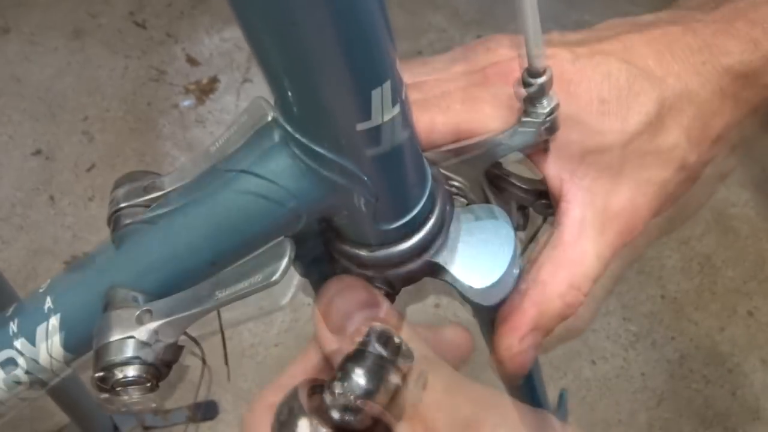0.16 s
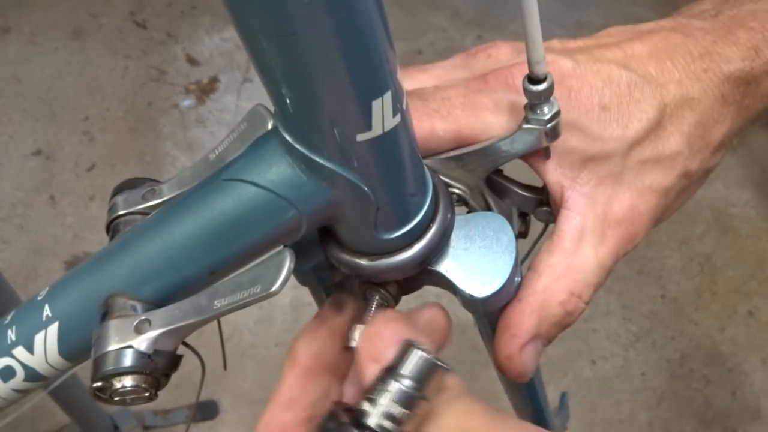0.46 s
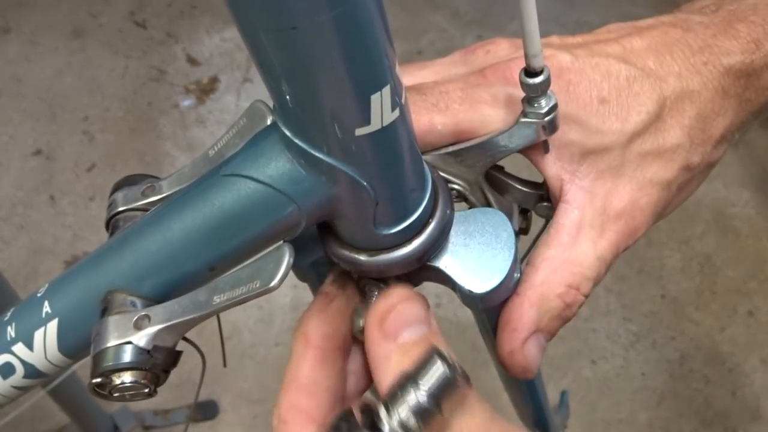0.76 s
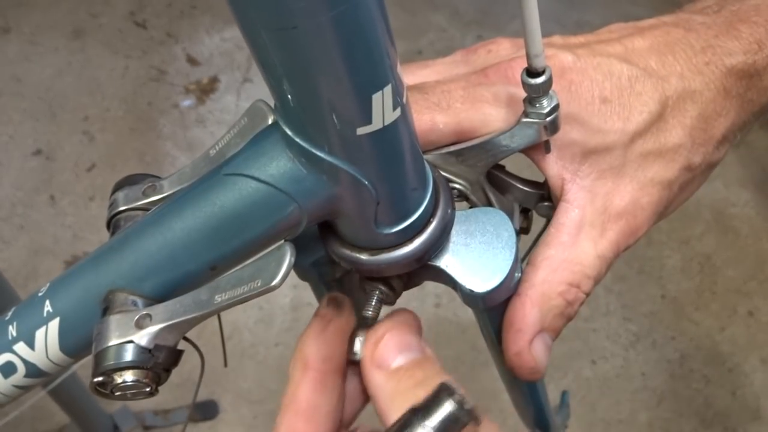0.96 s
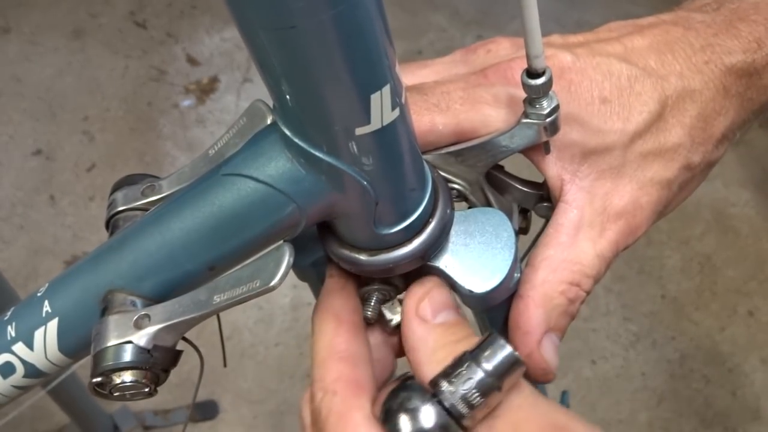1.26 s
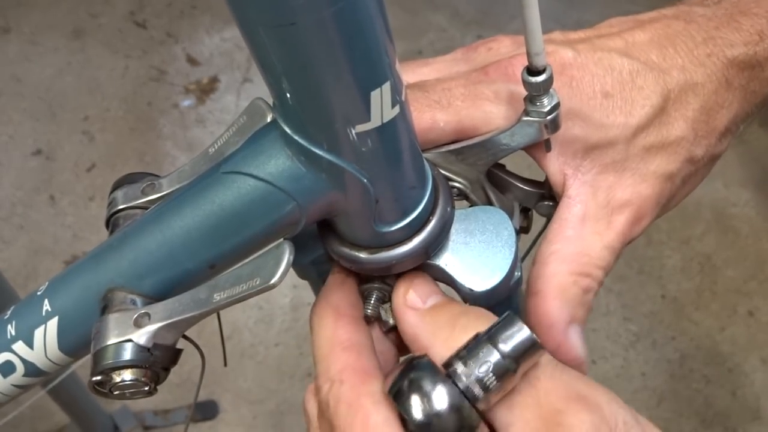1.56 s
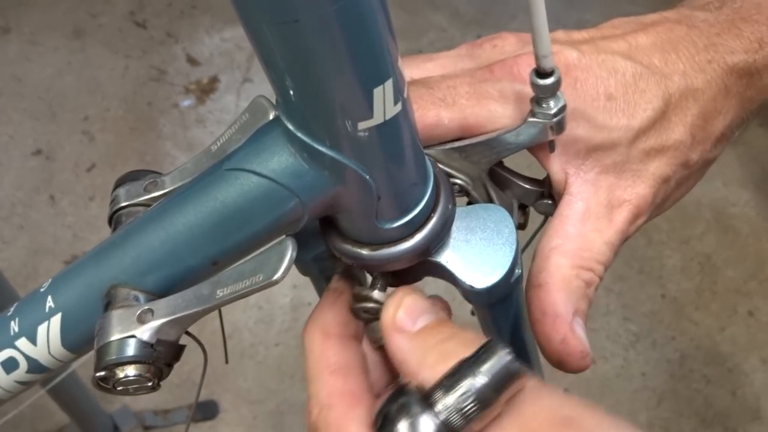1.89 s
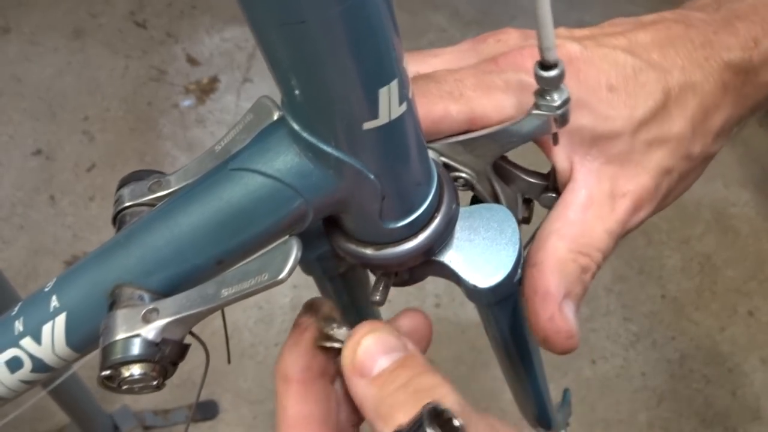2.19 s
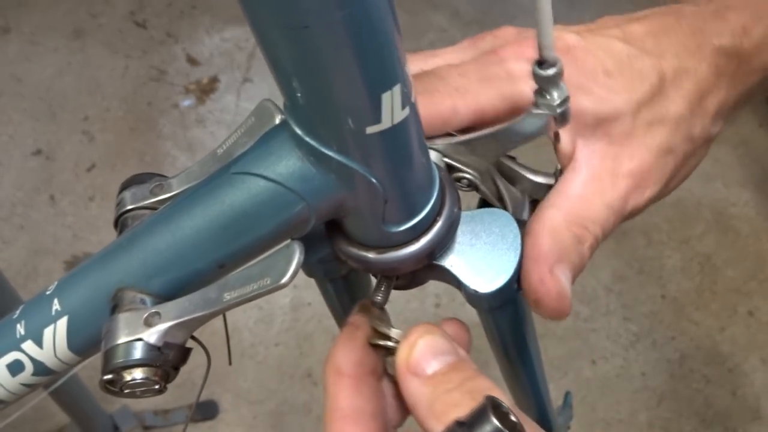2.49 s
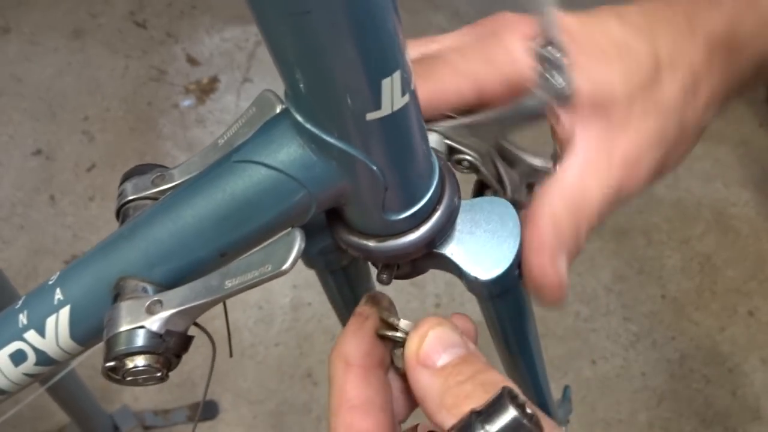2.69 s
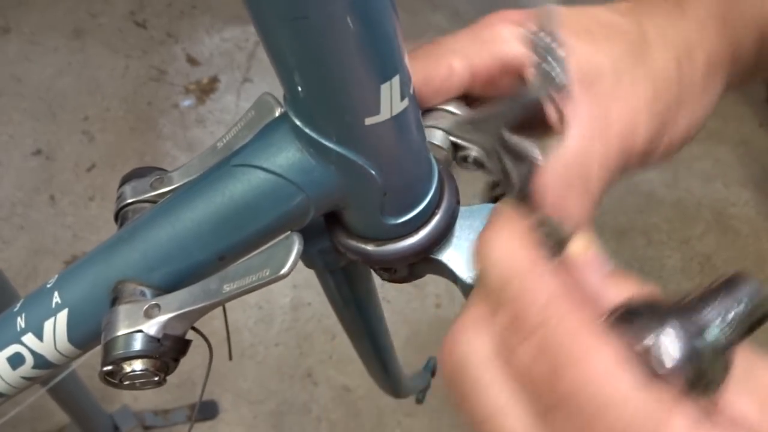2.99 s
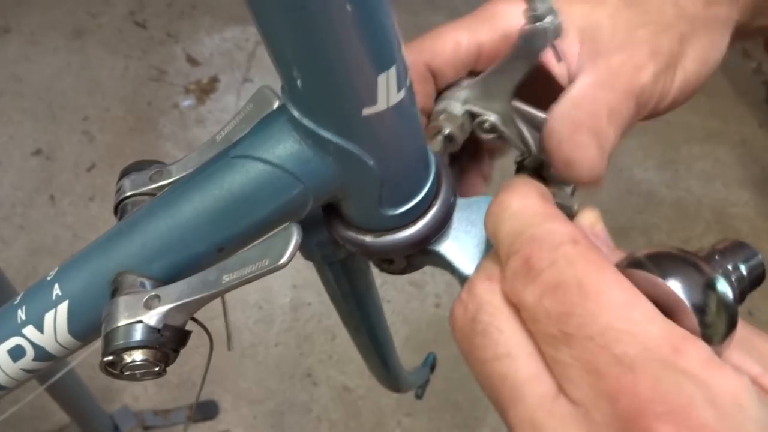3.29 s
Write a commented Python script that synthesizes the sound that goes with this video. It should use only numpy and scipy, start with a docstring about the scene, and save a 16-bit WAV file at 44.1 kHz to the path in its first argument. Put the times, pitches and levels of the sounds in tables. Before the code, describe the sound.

Ratchet wrench clicks in short bursts, then small loose steel parts clink and knock.

```python
"""In a workshop, a ratchet wrench clicks in short bursts at a bicycle brake nut; the nut and washer spin
off, then loose brake parts clink, rub and knock on the frame tubes. Clicks and clinks are noise snaps
plus decaying steel modes, rubs are dense random slips, knocks are short contacts ringing tube modes.
Thin pings, a patchy noise hum, a growing low rumble and a noise-tail room complete it, in stereo."""
import sys
import numpy as np
from scipy import signal
from scipy.fft import rfft, irfft
from scipy.io import wavfile
from scipy.ndimage import uniform_filter1d

SR = 44100
rng = np.random.default_rng(int(sys.argv[2]) if len(sys.argv) > 2 else 0)


def file_out(sig):
    """Save sig as 16-bit WAV at sys.argv[1]."""
    # one column per channel
    cols = np.atleast_2d(sig).T
    # limit, then scale
    lim = np.clip(cols, -1, 1)
    pcm = np.round(lim * 32767).astype(np.int16)
    wavfile.write(sys.argv[1], SR, pcm)


N = 152145


def amp(db):
    """dB to gain."""
    return 10 ** (np.asarray(db) / 20)


def evened(x):
    """Scales to rms 1."""
    return x / np.sqrt(np.mean(x ** 2) + 1e-20)


def read(points, hz):
    """Interpolates a spectrum on a log frequency axis."""
    f, value = np.transpose(points)
    return np.interp(np.log(hz + 1), np.log(f + 1), value)


def curve(points):
    """Level curve as gain, -120 dB outside its points."""
    t, db = np.transpose(points)[:2]
    return amp(np.interp(np.arange(N) / SR, t, db, -120, -120))


def colour(x, points):
    """Filters by a spectrum in dB."""
    gain = amp(read(points, np.fft.rfftfreq(len(x), 1 / SR)))
    return irfft(rfft(x) * gain, len(x))


SPLIT_HZ = 8650


def halves(x):
    """Splits into body and treble around SPLIT_HZ."""
    high = colour(x, [(.8 * SPLIT_HZ, -30), (1.2 * SPLIT_HZ, 0)])
    return x - high, high


def ring(drive, hz, db, t60):
    """Two-pole resonator: one decaying mode excited by the drive."""
    r = 10 ** (-3 / (t60 * SR))
    w = 2 * np.pi * hz / SR
    return amp(db) * signal.lfilter([0, np.sin(w)], [1, -2 * r * np.cos(w), r * r], drive)


NEIGHBOUR_SPREAD, NEIGHBOUR_DB = .022, -7  # spread: fraction of mode frequency


def cluster(modes):
    """Each mode brings two weaker neighbours close by, as uneven steel parts do."""
    apart = 1 + NEIGHBOUR_SPREAD * rng.standard_normal((len(modes), 2))
    neighbours = [(hz * ratio, db + NEIGHBOUR_DB, t60)
                  for (hz, db, t60), ratios in zip(modes, apart) for ratio in ratios]
    return list(modes) + neighbours


# contact noise spectrum: (frequency [Hz], relative level [dB])
SNAP_SPECTRUM = [(1200, -12), (2600, -11), (3600, -2), (6500, -7.5), (9000, -7.5), (12000, -8),
                 (15500, -13)]
SNAP_T60_S, SNAP_RISE_S = 0.01, 0.0014
DETUNE, SPREAD_DB = .004, 3.5  # per-strike deviations; DETUNE as a fraction


def strikes(events, modes, ring_db, snap_db):
    """Each strike is a noisy snap and rings the modes, each time a little differently."""
    t, out = np.arange(SR // 8) / SR, np.zeros(N + SR)
    hz, mode_db, t60 = np.transpose(modes)[..., None]
    luck = rng.standard_normal((len(events), 3, len(modes), 1))
    rise = np.minimum(t / SNAP_RISE_S, 1)
    low, high = halves(evened(colour(rng.standard_normal(N + SR), SNAP_SPECTRUM)))
    for (s, db, treble_db), (size, tune, phase) in zip(events, luck):
        start = round(s * SR)
        at = slice(start, start + len(t))
        tilt_db = treble_db * (hz > SPLIT_HZ)
        level = amp(ring_db + mode_db + tilt_db + SPREAD_DB * size - 60 * t / t60)
        tones = (level * np.sin(2 * np.pi * (hz * (1 + DETUNE * tune) * t + phase))).sum(0)
        snap = amp(snap_db - 60 * t / SNAP_T60_S) * (low[at] + amp(treble_db) * high[at])
        out[at] += amp(db) * rise * (tones + snap)
    return out[:N]


RUB_RISE_S, RUB_STOP_S, SLIP_T60_S = .004, 0.018, 0.014  # RUB_STOP_S: time constant
GRIT_DB = 4  # slip size per unit of the exponential draw


def rub(strokes, modes, per_s, ring_db, hiss_db, damping, fade_db):
    """Each stroke: dense short slips of uneven size hiss and ring the hand-damped modes."""
    t = np.arange(N) / SR
    grit = amp(GRIT_DB * np.minimum(rng.exponential(1, N), 4))
    size = grit * (rng.random(N) < per_s / SR)
    envelope = signal.lfilter([1], [1, -amp(-60 / SLIP_T60_S / SR)], size)
    slips = evened(envelope * rng.standard_normal(N))
    low, high = np.zeros((2, N))
    for s, length, db, treble_db in strokes:
        u = np.clip(t - s, 0, length)
        rise = np.minimum(u / RUB_RISE_S, 1)
        stop = np.exp(-np.maximum(t - s - length, 0) / RUB_STOP_S)
        shape = rise * stop * amp(db + fade_db * u / length)
        low = low + shape
        high = high + shape * amp(treble_db)
    # expected rms of the summed modes
    unit = np.sqrt(sum(amp(2 * db) * t60 * damping * SR / (12 * np.log(10)) for f, db, t60 in modes))
    tone = np.zeros(N)
    for k, (f, db, t60) in enumerate(modes):
        drive = np.roll(slips, 331 * k)  # decorrelates the modes
        tone += ring(drive * (high if f > SPLIT_HZ else low), f, db, t60 * damping)
    body, top = halves(evened(colour(slips, SNAP_SPECTRUM)))
    return amp(ring_db) * tone / unit + amp(hiss_db) * (low * body + high * top)


# hum spectrum: (frequency [Hz], relative level [dB])
HUM_SPECTRUM = [(35, -46), (60, -24), (91, -11), (172, -3), (480, -9), (515, -10.5), (1470, -2),
                (2300, -17), (16000, -54)]
# channel likeness: (frequency [Hz], likeness [0-1])
HUM_LIKENESS = [(100, 0.99), (500, 0), (5000, 0.17), (15000, 1)]
# channel balance: (frequency [Hz], left minus right [dB])
HUM_LEAN = [(300, -0.5), (1500, 7.5), (5000, -17)]
HUM_DB = -50


def hum():
    """Steady workshop noise with patchy spectral levels, leaning left in the mid band."""
    frames, hz = N // 256 + 5, np.fft.rfftfreq(1024, 1 / SR)
    a, b, c, d, patches = rng.standard_normal((frames, 513, 5)).T
    patches = evened(uniform_filter1d(uniform_filter1d(patches, 10, 0), 10, 1))
    same = np.clip(read(HUM_LIKENESS, hz), -1, 1)[:, None]
    left = a + 1j * b
    right = same * left + np.sqrt(1 - same ** 2) * (c + 1j * d)
    lean_db = np.array([.5, -.5])[:, None, None] * read(HUM_LEAN, hz)[:, None]
    level_db = read(HUM_SPECTRUM, hz)[:, None] + 1.8 * patches + lean_db
    z = np.array([left, right]) * amp(level_db)
    return amp(HUM_DB) * evened(signal.istft(z, nperseg=1024, noverlap=768)[1][:, :N])


# rumble level: (time [s], level [dB])
RUMBLE_LEVEL = [(0, -65.5), (1.8, -59.5), (3.45, -50.5)]


def rumble():
    """Low centred noise, filtered around 44 Hz, that grows through the scene."""
    spectrum = [(28, -31.5), (44, -0.5), (62, -17.5), (130, -11), (300, -34.5)]
    return curve(RUMBLE_LEVEL) * evened(colour(rng.standard_normal(N), spectrum))


# single pawl and socket clicks: (time [s], relative level [dB], treble [dB])
PAWL_CLICKS = [(0.0833, -12, 2), (0.0893, -15, -3), (0.1703, -10.5, 7), (0.2628, -17, -15),
               (0.3256, -24, -12), (0.41, -12, -13), (0.4836, -15.5, 1), (0.5027, -18.5, 7),
               (0.5347, -26, 8.5), (0.5603, -29, -17), (0.6073, -18, -3), (0.697, -34, -20),
               (0.7649, -21.5, -9), (0.957, -35, -26), (1.0912, -27, -9), (1.2267, -29.5, -5),
               (1.2965, -28.5, -13)]
# runs of ratchet teeth: (start [s], teeth [count], gap [s], relative level [dB], treble [dB])
TOOTH_RUNS = [(0.1007, 6, 0.011, -11, 10), (0.4305, 5, 0.0105, -16, 5), (1.1171, 5, .011, -21, -5.5)]
# wrench steel modes: (frequency [Hz], relative level [dB], t60 [s])
WRENCH_MODES = [(4120, -5, .018), (5430, -9, .03), (6050, -2, .018), (8080, -5, .028), (11000, -6, .022),
                (11760, -8, .02), (13230, -9, .02)]
# wrench strokes: (start [s], length [s], relative level [dB], treble [dB])
WRENCH_STROKES = [(0, 0.075, -46, -1), (.078, 0.2, -38.5, -6), (.175, 0.14, -38.5, -1.5),
                  (.41, .13, -47, -8), (.54, 0.48, -54, -8.5), (1.2, 0.13, -54.5, -14)]


def wrench():
    """Ratchet tooth runs and single clicks strike the wrench steel; sliding rubs it."""
    teeth = [(s + k * gap, db, treble_db)
             for s, count, gap, db, treble_db in TOOTH_RUNS for k in range(round(count))]
    steel = cluster(WRENCH_MODES)
    clicks = strikes(teeth + list(PAWL_CLICKS), steel, ring_db=-16.5, snap_db=-5)
    slide = rub(WRENCH_STROKES, steel, per_s=700, ring_db=-3, hiss_db=-3, damping=.5, fade_db=-9)
    return colour(clicks + slide, [(3000, -4.5), (4300, 0.5)])


# knocks on the frame: (time [s], relative level [dB], centre of favoured modes [Hz])
FRAME_KNOCKS = [(0.084, -43, 430), (.262, -42, 1100), (0.484, -42.5, 330), (1.82, -40, 428),
                (2.83, -37.5, 480), (2.925, -33.5, 1300), (3.025, -36.5, 610), (3.272, -18, 1950),
                (3.31, -22, 396), (3.316, -13.5, 1210), (3.374, -29, 1270), (3.415, -30.5, 406),
                (3.434, -27, 1010)]
# frame tube modes: (frequency [Hz], relative level [dB], t60 [s])
FRAME_MODES = [(250, -7, .05), (400, -1, .09), (585, -2, .05), (740, -4, .03), (1185, -1, .05),
               (1298, -4, .07), (1685, -2, .04), (2280, -3, .03)]
SPOT_OCT, CONTACT_S = .42, .00015  # mode selection width (sigma), contact time constant


def frame():
    """Each knock is a short rough contact that rings the tube modes near its centre."""
    t, out = np.arange(SR // 3) / SR, np.zeros(N + SR)
    hz, db, t60 = np.transpose(FRAME_MODES)[..., None]
    modes = amp(db - 60 * t / t60) * np.sin(2 * np.pi * hz * t)
    contacts = abs(rng.standard_normal((len(FRAME_KNOCKS), 800))) * np.exp(-t[:800] / CONTACT_S)
    for (s, knock_db, centre), contact in zip(FRAME_KNOCKS, contacts):
        near = np.exp(-(np.log2(hz / centre) / SPOT_OCT) ** 2 / 2)
        knock = signal.fftconvolve((near * modes).sum(0), contact / contact.sum())[:len(t)]
        out[round(s * SR):][:len(t)] += amp(knock_db) * knock
    return out[:N]


# thin pings: (time [s], relative level [dB])
PING_EVENTS = [(.268, -46.5), (.487, -48), (1.81, -34)]
PING_HZ, PING_T60_S, PING_RISE_S = 1961, 0.34, 0.025


def pings():
    """A lone long mode of fixed pitch that swells in and dies."""
    t, out = np.arange(N) / SR, 0
    for s, db in PING_EVENTS:
        u = np.maximum(t - s, 0)
        envelope = amp(db - 60 * u / PING_T60_S) * np.minimum(u / PING_RISE_S, 1)
        out = out + envelope * np.sin(2 * np.pi * PING_HZ * t)
    return out


def loose(clinks, strokes, modes):
    """A loose steel part clinking and sliding on one set of clustered modes."""
    steel = cluster(modes)
    slide = rub(strokes, steel, per_s=400, ring_db=-4, hiss_db=-4, damping=.45, fade_db=-8.5)
    return slide + strikes(clinks, steel, ring_db=-12.0, snap_db=-1.5)


# nut and washer clinks: (time [s], relative level [dB], treble [dB])
NUT_STRIKES = [(1.793, -29.5, 0), (1.8054, -19.5, -1), (1.8173, -16, 3), (1.8284, -14.5, -2),
               (1.8366, -19.5, 3.5), (1.8471, -17, -3), (1.9702, -30, 0), (1.9965, -44, 13),
               (2.1094, -30.5, -2)]
# nut steel modes: (frequency [Hz], relative level [dB], t60 [s])
NUT_MODES = [(3250, -2, .03), (4865, -6, .05), (5440, -2, .07), (6000, -9, .03), (7440, -7, .05),
             (9620, -10, .04), (10640, -9, .04)]
# nut strokes: (start [s], length [s], relative level [dB], treble [dB])
NUT_STROKES = [(1.576, 0.11, -50, -4), (1.777, 0.062, -38.5, -17), (1.85, 0.15, -42, -2.5),
               (2.031, 0.21, -51, -10)]


def nut():
    """Nut and washer spun off the bolt: struck and rubbed steel modes."""
    return loose(NUT_STRIKES, NUT_STROKES, NUT_MODES)


# brake part clinks: (time [s], relative level [dB], treble [dB])
BRAKE_STRIKES = [(2.3714, -34, 0.5), (2.3963, -37.5, 8), (2.4151, -30.5, 1), (2.5612, -38, 4),
                 (2.602, -28.5, 1.5), (2.6201, -29, 2), (2.735, -36.5, 4), (2.835, -22, 6),
                 (2.8608, -22.5, 9.5), (2.9502, -32.5, 9), (3.0185, -30, -5), (3.048, -43, 7),
                 (3.0866, -27, 9), (3.1554, -40, 0), (3.1806, -37, 6), (3.271, -10, -9.5), (3.298, -29, 5),
                 (3.3059, -14.5, -5), (3.3095, -8.5, -12), (3.4112, -32, -13), (3.4375, -14.5, -5)]
# brake steel modes: (frequency [Hz], relative level [dB], t60 [s])
BRAKE_MODES = [(3380, -9, .03), (4045, -12, .04), (4865, -8, .04), (5270, -3, .035), (5945, -1, .045),
               (7020, -4, .03), (10390, -8, .025), (13220, -4, .03)]
# brake strokes: (start [s], length [s], relative level [dB], treble [dB])
BRAKE_STROKES = [(2.34, 0.2, -57, 4), (2.487, 0.034, -53.5, 2), (2.559, 0.095, -46.5, 3),
                 (2.68, 0.095, -48.5, 10), (2.821, 0.69, -49.5, 8), (3.015, 0.093, -47, 9),
                 (3.148, 0.025, -42, 4.5), (3.245, 0.048, -52, 2), (3.282, 0.066, -30.5, -9),
                 (3.368, 0.17, -34.5, -2.5), (3.411, 0.34, -29.5, -11)]


def brake():
    """Loose brake parts: struck and rubbed steel modes."""
    return loose(BRAKE_STRIKES, BRAKE_STROKES, BRAKE_MODES)


ROOM_DB, ROOM_T60_S = -7, 0.31


def room(x):
    """Short decaying noise tail, partly different per channel."""
    t = np.arange(SR // 2) / SR
    tail = rng.standard_normal((2, len(t))) * amp(-60 * t / ROOM_T60_S) * (t > .003)
    tail[1] = .8 * tail[0] + .6 * tail[1]
    tail = tail / np.linalg.norm(tail[0])
    return amp(ROOM_DB) * signal.fftconvolve(x[None], tail, axes=1)[:, :N]


def scene():
    """Wrench, nut, brake, frame and pings near the middle, in the room, over hum and rumble."""
    # gains [dB]: left, right
    near = wrench() * amp([[-.3], [.3]])
    near = near + (nut() + brake()) * amp([[.2], [-.2]])
    near = near + (frame() + pings()) * amp([[1.5], [-1.5]])
    return near + room(near.mean(0)) + hum() + rumble()


EDGE_HZ = 15750


def record(dry):
    """Linear-phase low-pass at EDGE_HZ."""
    lowpass = signal.firwin(511, EDGE_HZ, window=("kaiser", 9), fs=SR)
    return signal.oaconvolve(dry, lowpass[None], "same")


dry = scene()
out = record(dry)
file_out(out)
```